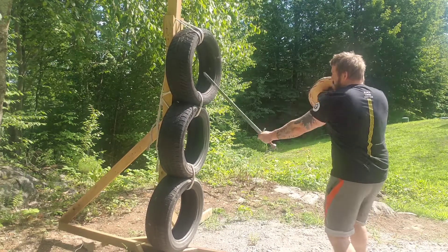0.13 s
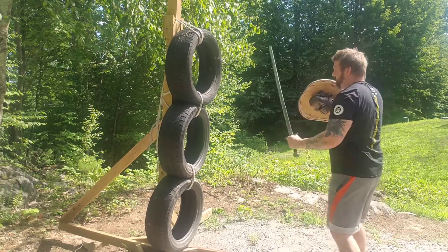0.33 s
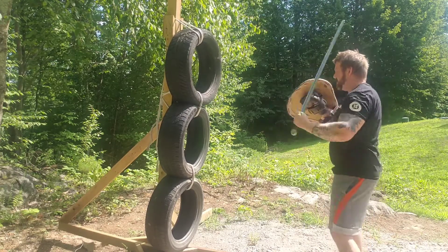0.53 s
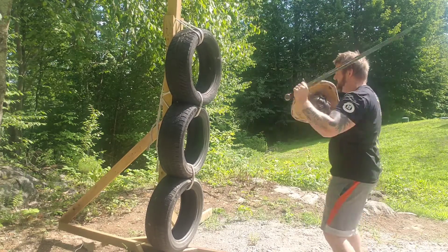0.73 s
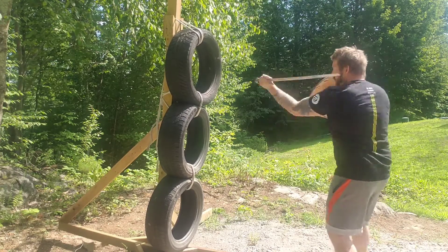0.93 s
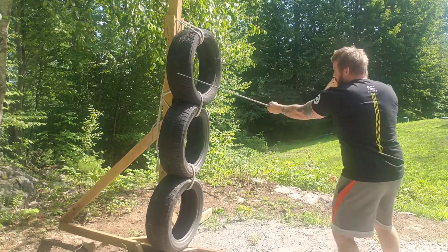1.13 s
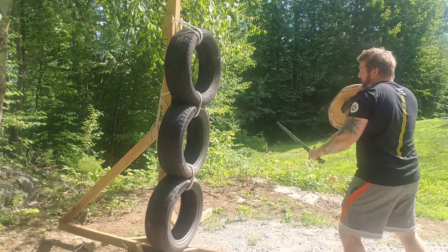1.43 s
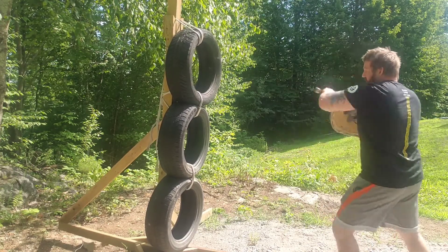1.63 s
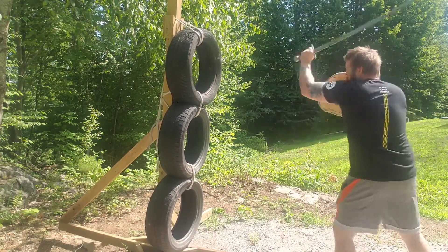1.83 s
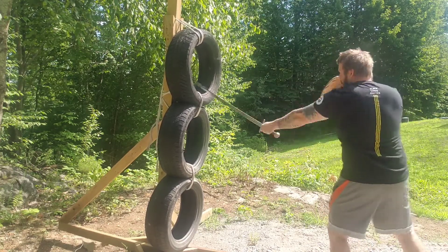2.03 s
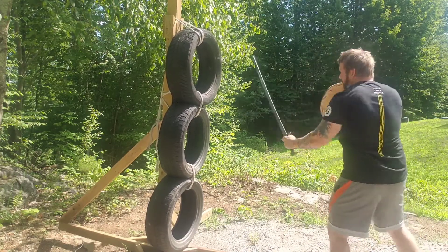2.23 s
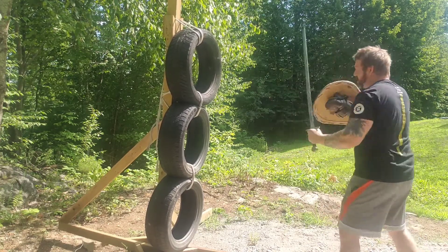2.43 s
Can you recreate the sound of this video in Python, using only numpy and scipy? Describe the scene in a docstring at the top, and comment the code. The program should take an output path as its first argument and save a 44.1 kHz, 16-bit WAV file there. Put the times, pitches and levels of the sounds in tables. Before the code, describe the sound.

Three hard sword blows on a tire stack, dull rubbery thumps with faint steely ring outdoors.

```python
"""A steel sword strikes a stack of hanging tires three times, on gravel at the edge of a wood.
Each blow sums damped rubber modes, a beating air cavity, noise bursts and paired blade modes;
the second lands twice. Decaying diffuse noise, convolved with the blows, is the answer of the trees.
Grainy noise scuffs the gravel, damped tones knock as stones, and hilt and gear click,
all over a faint rumble, air and hiss of filtered noise."""
import sys
import numpy as np
from scipy import signal
from scipy.fft import rfft, irfft, next_fast_len
from scipy.io import wavfile
from scipy.ndimage import uniform_filter1d, map_coordinates

SR = 44100
rng = np.random.default_rng(int(sys.argv[2]) if len(sys.argv) > 2 else 0)


def to_wav(s):
    """Save 16-bit WAV."""
    ch = np.atleast_2d(s).T  # columns
    pcm = np.round(np.clip(ch, -1, 1) * 32767)  # PCM
    wavfile.write(sys.argv[1], SR, pcm.astype(np.int16))


N = 114660

# likeness of the left and right noise: frequency_hz, correlation (-1 to 1)
ALIKE = [(100, 0.92), (400, 1), (1100, 0.23), (2500, 0.62), (5000, -0.8), (12000, 0.62)]


def amp(db):
    """Level in decibels to amplitude ratio."""
    return 10 ** (np.asarray(db) / 20)


def unit(x):
    """Normalization to a root-mean-square of 1."""
    return x / np.sqrt(np.mean(x ** 2) + 1e-20)


def along(points, hz):
    """Interpolation of (frequency_hz, value) points on a logarithmic frequency axis."""
    f, v = np.transpose(points)
    return np.interp(np.log(hz + 1), np.log(f + 1), v)


def filtered(x, response):
    """Linear filtering: the spectrum of x times a response of frequency."""
    m = next_fast_len(x.shape[-1] + SR // 4)
    hz = np.fft.rfftfreq(m, 1 / SR)
    return irfft(rfft(x, m) * response(hz), m)[..., :x.shape[-1]]


def noise(spectrum, alike, size=N, tilt_db=0):
    """Partly correlated stereo noise by mid and side; a flat 0 dB spectrum without tilt gives rms 1."""
    def response(hz):
        turn = np.arccos(np.clip(along(alike, hz), -1, 1)) / 2
        colour = amp(along(spectrum, hz) + tilt_db * np.log2(hz + 1))
        return colour * np.array([np.cos(turn), np.sin(turn)])
    mid, side = filtered(rng.standard_normal((2, size)), response)
    return np.array([mid + side, mid - side])


def fade(t, t60):
    """Exponential damping: 60 dB down after t60 seconds."""
    return np.exp(-np.log(1000) * t / t60)


def rise(t, rise_s):
    """Exponential approach to full strength with time constant rise_s."""
    return 1 - np.exp(-t / rise_s)


def add(out, s, x):
    """Superposition: mix x into out from time s in seconds."""
    i = int(round(s * SR))
    out[:, i:i + x.shape[-1]] += x[..., :N - i]


def outdoors():
    """Stationary filtered noise makes air and hiss; a slow level curve modulates the low rumble."""
    # colour of the rumble: frequency_hz, level_db
    rumble_colour = [(20, -28), (40, -4), (58, -3), (95, -6.5), (130, -13.5), (190, -36.5), (400, -43.5)]
    # swells of the rumble: time_s, level_db
    rumble_level = [(0.0, -58), (0.48, -54), (0.85, -65), (1.1, -57.5), (1.4, -49), (1.6, -61.5),
                    (2.25, -52), (2.6, -59.5)]
    # colour of the air: frequency_hz, level_db
    air_colour = [(150, -6.5), (300, -7.5), (600, -4), (1000, -5), (1400, -14), (2200, -22), (3600, -24.5),
                  (7000, -14), (10000, -29.5), (16000, -24.5)]
    # colour of the high outdoor hiss: frequency_hz, level_db
    hiss_colour = [(3500, -30.5), (4500, -17), (4950, 1), (5800, -9.5), (6900, 0.5), (7600, 0.5), (8750, 0),
                   (9300, -19.5), (12000, -58.5)]
    air_db, hiss_db = -69.5, -69.5

    swell_db = np.interp(np.arange(N) / SR, *np.transpose(rumble_level))
    rumble = amp(swell_db) * unit(noise(rumble_colour, ALIKE))
    air = amp(air_db) * unit(noise(air_colour, ALIKE))
    hiss = amp(hiss_db) * unit(noise(hiss_colour, ALIKE))
    return rumble + air + hiss


def feet():
    """Granular friction gives roughly modulated noise; stones struck underfoot give damped tones."""
    # shoes scuffing gravel: start_s, length_s, level_db, brightness_db_per_octave
    scuffs = [(0.035, 0.083, -53.5, -2), (0.084, 0.081, -62, -3.5), (1.078, 0.068, -67, 1.5),
              (1.13, 0.042, -60, -1), (1.36, 0.063, -48, 1), (1.397, 0.083, -53.5, 1.5),
              (1.457, 0.19, -61, 4), (1.587, 0.079, -53.5, 0.5), (1.853, 0.044, -50, 0.5),
              (1.905, 0.14, -58, 1.5), (1.973, 0.048, -57, 0.5), (2.439, 0.05, -54.5, 2.5),
              (2.452, 0.019, -47, 0.5), (2.479, 0.11, -63.5, 3)]
    # colour of gravel: frequency_hz, level_db
    gravel = [(100, -18), (300, -4), (600, -0.5), (1400, -2), (2500, -11.5), (5000, -17.5), (9000, -23.5),
              (15000, -31.5)]
    # stones knocking underfoot: start_s, level_db, pitch_hz
    stones = [(.0472, -53.5, 655), (0.0912, -43.5, 513), (.139, -60, 593), (0.599, -54, 1270),
              (.620, -50.5, 960), (1.603, -42, 753)]
    # colour of a knock's noise: multiple_of_pitch, level_db
    knock_colour = [(.3, -20), (.8, -2), (1.15, 0), (2, -20), (6, -45)]
    grain_db = 3
    stone_t60, stone_rise_s, grit = 0.04, 0.00033, 1  # grit: noise rms added to a tone of peak 1

    out, t = np.zeros((2, N)), np.arange(SR // 3) / SR
    for s, length, db, tilt_db in scuffs:
        roughness = unit(uniform_filter1d(rng.standard_normal(len(t)), size=90))
        grains = unit(amp(grain_db * roughness))
        u = 3 * t / length
        swell = u * np.exp(1 - u)  # peaks a third of the way through
        scuff = unit(noise(gravel, ALIKE, size=len(t), tilt_db=tilt_db))
        add(out, s, amp(db) * swell * grains * scuff)
    for s, db, hz in stones:
        tone = np.sin(2 * np.pi * hz * t)
        rough = unit(noise(np.array(knock_colour) * [hz, 1], ALIKE, size=len(t)))
        knock = tone + grit * rough
        add(out, s, amp(db) * knock * fade(t, stone_t60) * rise(t, stone_rise_s))
    return out


def gear():
    """Short impacts as decaying noise: hilt and gear click, and rattle just after the last blow."""
    # small sharp clicks: start_s, level_db, t60_s, brightness_db_per_octave
    clicks = [(1.498, -50, .02, 4), (1.76, -58, .01, 1), (1.9518, -35, .013, 0), (2.104, -53, .008, 1.5),
              (2.192, -29, .05, 7), (2.492, -49, .012, 4)]
    # colour of a click: frequency_hz, level_db
    click_colour = [(300, -24), (900, -5), (1500, 10), (2400, -16.5), (6000, -16), (15000, -34.5)]

    out, t = np.zeros((2, N)), np.arange(SR // 10) / SR
    for s, db, t60, tilt_db in clicks:
        click = unit(noise(click_colour, ALIKE, size=len(t), tilt_db=tilt_db))
        add(out, s, amp(db) * click * fade(t, t60))
    return out


def echo(x, spectrum, decay, rise_s):
    """Diffuse scattering: convolution with noise whose frequencies each decay at their own rate."""
    # likeness of left and right in the echo: frequency_hz, correlation
    echo_alike = [(100, 1), (400, 0.87), (1000, 0), (3000, 0), (8000, 0.02)]
    hz, t, z = signal.stft(noise(spectrum, echo_alike, size=SR), SR, nperseg=256)
    t60 = along(decay, hz)[:, None]
    even_energy = np.sqrt(2 * np.log(1000) / (t60 * SR))  # a long decay gets no extra energy
    z = z * fade(t, t60) * rise(t, rise_s) * even_energy
    tail = signal.istft(z, SR, nperseg=256)[1]
    return signal.fftconvolve(x, tail, axes=1)


def rubber(t, modes, rise_s):
    """Modal superposition: damped modes all pushed inwards at once by a soft contact."""
    ringing = sum(amp(db) * np.cos(2 * np.pi * hz * t) * fade(t, t60) for hz, db, t60 in modes)
    return -rise(t, rise_s) ** 2 * ringing


def blade(t, odd_db, even_db, sustain):
    """Near-degenerate steel modes beat in pairs; the point of contact favours odd or even pairs."""
    # pitches of the blade modes in rising order: pitch_hz
    mode_pitches = [3277, 3910, 4308, 4824, 5326, 5830, 6330, 6804, 7330, 7868]
    # blade modes, odd and even by turns: level_db, t60_s (before the length ratio)
    mode_levels = [(-1, .28), (-1, .3), (4, .46), (3, .4), (3, .45), (2, .35), (3, .27), (-3, .27),
                   (5, .29), (5, .22)]
    # range of the crowded modes of blade and hilt: lowest_hz, highest_hz
    shimmer_range = (3400, 8700)
    shimmer_db, shimmer_t60 = 0, 0.2
    split_hz, twin_db = 44, -2  # nominal spacing of the pair, level of the twin
    wander_hz, roughness = 45.24, 0.5  # random knots per second, phase swing in radians
    flex_hz, flex_bend, flutter_db = 33, 0.6, 2  # flex_bend in radians

    out = np.zeros((2, len(t)))
    for k, (hz, (db, t60)) in enumerate(zip(mode_pitches, mode_levels)):
        knots = rng.standard_normal((2, 256))
        wander = np.array([map_coordinates(row, [t * wander_hz], mode="wrap") for row in knots])
        phase, twin_phase = rng.uniform(0, 2 * np.pi, (2, 2, 1))
        # flexing bends the pitch of the first of each pair
        flex = np.sin(2 * np.pi * flex_hz * t + rng.uniform(0, 2 * np.pi) + wander[0])
        twin_hz = hz + split_hz * rng.choice([-1, 1]) * rng.uniform(0.68, 1.3)
        first = np.sin(2 * np.pi * hz * t + phase + roughness * wander + flex_bend * flex)
        twin = np.sin(2 * np.pi * twin_hz * t + twin_phase - roughness * wander)
        pair = first + amp(twin_db) * twin
        # each channel flutters with the other's wander
        fluttering = unit(pair * amp(flutter_db * wander[::-1])) / 2
        contact_db = even_db if k % 2 else odd_db
        out += amp(db + contact_db) * fluttering * fade(t, sustain * t60)
    crowd = sum(rng.standard_normal((2, 1)) * np.sin(2 * np.pi * hz * t)
                for hz in rng.uniform(*shimmer_range, size=30))
    out += amp(shimmer_db + max(odd_db, even_db)) * unit(crowd) * fade(t, shimmer_t60)
    return out * rise(t, 0.015)


def blows():
    """Impact excitation: each contact sets off tire, cavity, noise and blade, and the wood answers."""
    # moments of contact: start_s
    contacts = [.2236, 1.2222, 1.2532, 2.1635]
    # one row per contact: boom_db, push_db, air_ring_db, air_ring_t60_s, tread_slap_db,
    # slap_pitch_ratio, dull_thud_db, crash_db, crash_tilt_db_per_octave,
    # odd_blade_modes_db, even_blade_modes_db, blade_ring_length_ratio
    strengths = [(-4.5, -20.5, -16.5, .3, 3.5, 0.98, -14, -17.5, -2, -37, -47, 1),
                 (-8.5, 4, -12.5, 0.25, -6.5, 0.92, -13, -24, -3, -60, -41.5, 1.3),
                 (-13, 0, -16.5, 0.11, -16, 0.95, -20, -31, 0, -63, -55.5, 1.8),
                 (-7, -32, -16.5, 0.27, 2.5, 0.97, -15, -19.5, -0.5, -38.5, -35.5, 0.85)]
    # tire modes: pitch_hz, level_db, t60_s
    tire_modes = [(86, -13.5, .17), (207, -29.5, 0.023), (248, 3.5, .068), (320, -7.5, 0.048),
                  (567, -17.5, 0.15), (739.5, -24, 0.14)]
    # short dent of the sidewall: pitch_hz, level_db, t60_s
    push_modes = [(283, -3, .032)]
    # tread modes before the slap pitch ratio: pitch_hz
    tread_pitches = [882, 960, 1068, 1140, 1283, 1378, 1732]
    # modes of the slapped tread: level_db, t60_s
    tread_levels = [(-20, 0.08), (-13, 0.025), (5.5, 0.019), (-21.5, 0.026), (-14.5, 0.045), (-13.5, 0.043),
                    (-15, 0.028)]
    # air ringing inside the tire, a beating pair: pitch_hz, level_db
    cavity = [(389, 0), (403, -12)]
    # colour of the dull thud: frequency_hz, level_db
    thud_colour = [(40, -30.5), (120, -10), (280, -11), (480, 7.5), (680, 4), (900, 3), (1350, 2),
                   (1800, -28), (3000, -23.5), (8000, -65)]
    # colour of the crash: frequency_hz, level_db
    crash_colour = [(500, -12), (1500, 1.5), (2500, -1.5), (4500, -1), (6500, -2.5), (7600, 2), (8800, -3),
                    (11500, 1.5), (15500, -3.5)]
    # answer of the trees: frequency_hz, level_db
    trees = [(60, -25), (170, -8), (245, -22.5), (320, -24.5), (390, -16.5), (495, -19), (700, -13),
             (1080, -14.5), (1400, -13.5), (2200, -9.5), (4000, -10), (8000, -9.5), (15000, -15.5)]
    # its decay: frequency_hz, t60_s
    trees_decay = [(100, 0.15), (400, 0.89), (1100, 0.27), (3000, 0.53), (7000, 0.54), (15000, .32)]
    # far echo from deep in the wood: frequency_hz, level_db
    far = [(80, -27.5), (240, -42), (390, -28.5), (500, -26.5), (800, -19), (1060, -23.5), (1300, -20.5),
           (2200, -27.5), (5000, -27), (14000, -44)]
    # its decay: frequency_hz, t60_s
    far_decay = [(100, 1.3), (1000, 1.5), (2500, 0.98), (12000, 0.59)]
    tire_rise_s, push_rise_s, tread_rise_s = 0.002, 0.00061, 0.0012
    thud_t60, thud_rise_s = 0.088, 0.00013
    crash_t60, crash_rise_s = 0.13, 0.0029
    blade_echo_db, cavity_echo_db = 1, 3.5

    out, t = np.zeros((2, N)), np.arange(SR * 3 // 4) / SR
    for s, row in zip(contacts, strengths):
        (boom_db, push_db, air_db, air_t60, slap_db, slap_pitch,
         thud_db, crash_db, tilt_db, odd_db, even_db, sustain) = row
        boom = amp(boom_db) * rubber(t, tire_modes, tire_rise_s)
        push = amp(push_db) * rubber(t, push_modes, push_rise_s)
        tread_modes = np.column_stack([slap_pitch * np.array(tread_pitches), tread_levels])
        slap = amp(slap_db) * rubber(t, tread_modes, tread_rise_s)
        # the tire radiates little between its two lowest modes: a notch at 142 Hz, Q 3
        tire = signal.lfilter(*signal.iirnotch(142, 3, fs=SR), boom + push + slap)

        thud = amp(thud_db) * unit(noise(thud_colour, ALIKE, size=len(t)))
        thud = thud * fade(t, thud_t60) * rise(t, thud_rise_s)
        crash = amp(crash_db) * unit(noise(crash_colour, ALIKE, size=len(t), tilt_db=tilt_db))
        crash = crash * fade(t, crash_t60) * rise(t, crash_rise_s)

        hit = tire + thud + crash
        ring = blade(t, odd_db, even_db, sustain)
        hollow = rubber(t, [(hz, air_db + db, air_t60) for hz, db in cavity], tire_rise_s)
        add(out, s, hit + hollow + ring)
        add(out, s, echo(hit + amp(blade_echo_db) * ring, trees, trees_decay, rise_s=0.01))
        add(out, s, echo(hit + amp(cavity_echo_db) * hollow, far, far_decay, rise_s=0.05))
    return out


def scene():
    """Interaural-style level and time differences: the right microphone hears all earlier and louder."""
    # excess of right over left: frequency_hz, level_db
    right_louder = [(60, 2), (250, 4), (1000, 1.4), (2500, 3), (5000, 7.5), (12000, 5.5)]
    right_lead_s = 0.00005
    side = np.array([[-.5], [.5]])  # half of each difference on either channel

    def response(hz):
        level = amp(side * along(right_louder, hz))
        return level * np.exp(2j * np.pi * hz * side * right_lead_s)
    return filtered(blows() + feet() + gear() + outdoors(), response)


def record(dry):
    """Band limiting and soft saturation: thins deep bass, rounds high peaks, cuts the extreme treble."""
    low_cut_hz, top_hz, ceiling = 47, 15900, 1.08
    thin = signal.sosfilt(signal.butter(2, low_cut_hz, "high", fs=SR, output="sos"), dry)
    held = thin / (1 + np.abs(thin / ceiling) ** 8) ** (1 / 8)
    return filtered(held, lambda hz: 1 / (1 + (hz / top_hz) ** 160))


dry = scene()
out = record(dry)
to_wav(out)
```